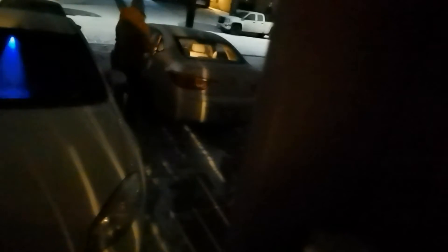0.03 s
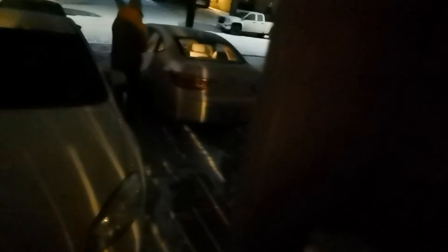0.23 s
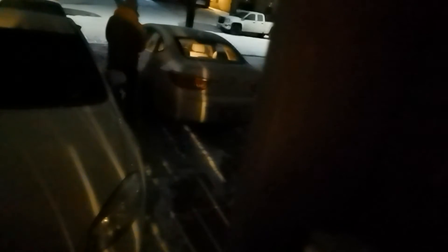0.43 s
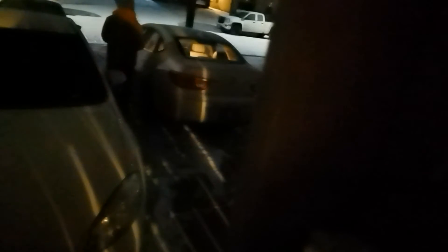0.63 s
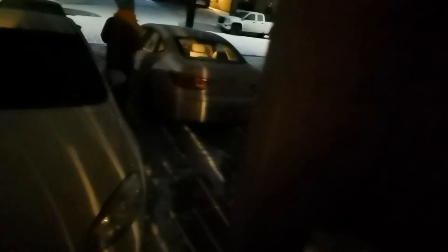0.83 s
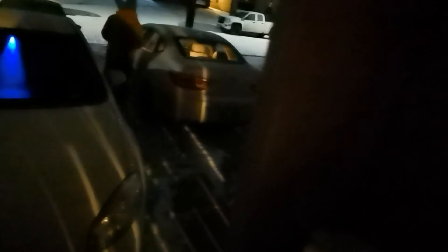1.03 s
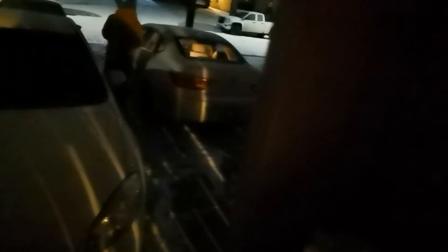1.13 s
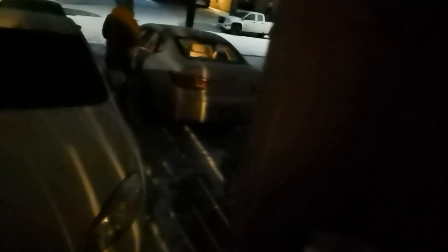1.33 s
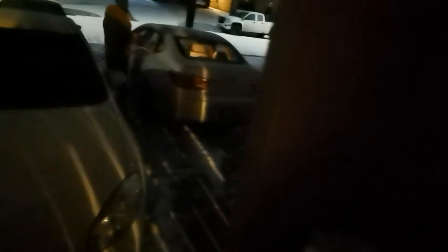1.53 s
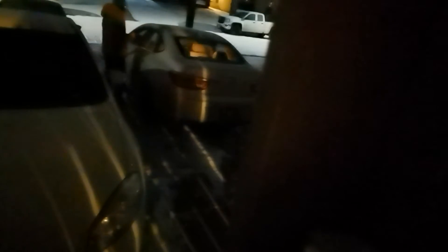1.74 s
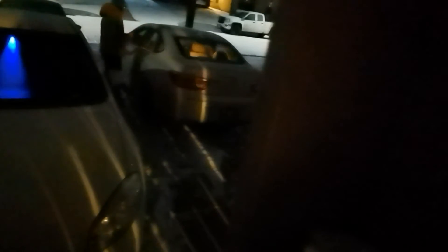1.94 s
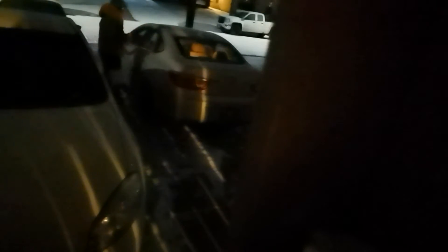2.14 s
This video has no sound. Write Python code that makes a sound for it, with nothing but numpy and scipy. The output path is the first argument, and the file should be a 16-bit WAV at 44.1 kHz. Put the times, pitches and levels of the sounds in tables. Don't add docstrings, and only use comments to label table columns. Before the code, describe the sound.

Outdoors in a night parking lot, a car door shuts with a sharp latch clack and deep thud, scattering off parked cars with a faint wall echo, then small footstep ticks over low far traffic.

```python
import sys
import numpy as np
from scipy import signal
from scipy.fft import rfft, irfft, next_fast_len
from scipy.io import wavfile
from scipy.ndimage import map_coordinates

SR = 44100
rng = np.random.default_rng(int(sys.argv[2]) if len(sys.argv) > 2 else 0)


def convert_level_to_amplitude(level_db):
    exponent = np.asarray(level_db, float) / 20
    return 10 ** exponent


def file_out(sig):
    cols = np.atleast_2d(sig).T
    lim = np.clip(cols, -1, 1)
    pcm = np.round(lim * 32767).astype(np.int16)
    wavfile.write(sys.argv[1], SR, pcm)


N = 97020
LUMPS_DB = 4.5


def unit(x):
    return x / np.sqrt(np.mean(x ** 2) + 1e-20)


def along(points, hz):
    f, v = np.transpose(points)
    return np.interp(np.log(hz + 1), np.log(f + 1), v)


def level(rows):
    return convert_level_to_amplitude(np.interp(np.arange(N) / SR, *np.transpose(rows)))


def wobble(rate):
    knots = rng.standard_normal(int(N * rate / SR) + 4)
    return map_coordinates(knots, [np.arange(N) * rate / SR])


def swell(length_s):
    u = np.linspace(0, 1, round(length_s * SR))
    uneven = convert_level_to_amplitude(1.3 * wobble(40)[SR:SR + len(u)])
    return np.minimum(u / .15, 1) * np.minimum((1 - u) / .3, 1) * uneven


def filtered(x, response):
    m = next_fast_len(x.shape[-1] + SR // 4)
    return irfft(rfft(x, m) * response(np.fft.rfftfreq(m, 1 / SR)), m)[..., :x.shape[-1]]


def peaks(table):
    def response(f):
        total = 0
        for k, (hz, width, db) in enumerate(table):
            total = total + (-1) ** k * convert_level_to_amplitude(db) * 1j * f * width / (hz * hz - f * f + 1j * f * width)
        return total
    return response


def band(hz, width):
    return lambda f: abs(peaks([(hz, width, 0)])(f)) ** 2


def lumpy(gain, depth_db):
    knots = rng.standard_normal(160)
    return lambda hz: gain(hz) * convert_level_to_amplitude(depth_db * map_coordinates(knots, [hz / 160]))


def pair(gain, alike, size):
    def mid_side(hz):
        turn = np.arccos(np.clip(along(alike, hz), -1, 1)) / 2
        return gain(hz) * [np.cos(turn), np.sin(turn)]
    mid, side = filtered(rng.standard_normal((2, size)), mid_side)
    return unit(np.array([mid + side, mid - side]))


def dying(x, t60, scale):
    hz, t, z = signal.stft(x, SR, nperseg=128)
    decay = convert_level_to_amplitude(-60 * t / (scale * along(t60, hz)[:, None]))
    return signal.istft(z * decay, SR, nperseg=128)[1][:, :x.shape[1]]


def ring(modes, t):
    return sum(convert_level_to_amplitude(db - 60 * t / t60) * np.sin(2 * np.pi * hz * t) for hz, db, t60 in modes)


def add(out, s, x):
    k = round(s * SR)
    out[:, k:k + x.shape[-1]] += x[..., :N - k]


# pitch_hz, likeness
CAR_ALIKE = [(60, .99), (350, .995), (650, .72), (1500, .75), (3100, .68), (6000, .05), (15000, -.1)]


def ping(hz, t60, crack, t):
    blur = pair(band(hz, .4 * hz), CAR_ALIKE, len(t))
    return convert_level_to_amplitude(-60 * t / t60) * (np.sin(2 * np.pi * hz * t) + crack * blur) * (1 - np.exp(-t / 0.00094))


# time_s, level_db
TRAFFIC = [(0, -47.5), (.55, -51), (.8, -50), (1.05, -48.5), (1.2, -51), (1.6, -51), (1.9, -50.5),
           (2.02, -49.5), (2.2, -51.5)]
# pitch_hz, level_db per Hz
ROAD = [(35, -32.5), (60, -2.5), (155, -4.5), (286, -7.5), (501, -16.5), (633, -18), (800, -30),
        (1160, -29.5), (2500, -47), (3250, -64), (5500, -120)]
# pitch_hz, likeness
ROAD_ALIKE = [(60, 0.9), (180, 1), (550, 0.86), (1650, -0.22), (4970, 1), (15000, -0.04)]
# time_s, level_db
RUMBLE = [(0, -41), (.12, -45), (.2, -52), (.48, -52), (.54, -46.5), (.6, -43.5), (.74, -51), (.9, -42.5),
          (1.22, -49), (1.27, -55), (1.35, -50), (1.6, -48.5), (2.0, -48), (2.2, -53.5)]
# pitch_hz, level_db per Hz
DEEP = [(8.8, -37.5), (15, -6), (54, -0.5), (83, -10), (114, -20), (130, -27.5), (170, -50.5), (290, -120)]
# pitch_hz, width_hz, level_db
DRONES = [(161.7, 29, -56),
          (1850, 15, -85), (1390, 60, -84)]


def street():
    sway = convert_level_to_amplitude(.7 * wobble(3.07) + .8 * wobble(12.11))
    road = level(TRAFFIC) * sway * pair(lambda hz: convert_level_to_amplitude(along(ROAD, hz)), ROAD_ALIKE, N)
    deep = level(RUMBLE) * pair(lambda hz: convert_level_to_amplitude(along(DEEP, hz)), [(50, 0.99)], N)
    drones = np.zeros((2, N))
    for hz, width, db in DRONES:
        drones += convert_level_to_amplitude(db + 2 * wobble(4.94)) * pair(band(hz, width), ROAD_ALIKE, N)
    return road + deep + drones


# start_s, peak_db, pitch_hz
TICKS = [(0.017, -62.5, 2650), (.018, -65.5, 4550), (0.3918, -43.5, 1270), (0.4083, -39, 1360),
         (.409, -54, 2390), (.425, -47.5, 1320), (.435, -59.5, 2680), (0.443, -55, 1300),
         (0.4773, -56.5, 1300), (0.642, -60.5, 1280), (.889, -58, 1330), (.889, -64, 950),
         (.891, -57.5, 2440), (0.948, -59, 990), (.969, -61, 2480), (.972, -61, 1480), (1.01, -59.5, 1342),
         (.83, -66, 3170), (.872, -67.5, 4930), (1.03, -70, 3950), (1.27, -69, 4150), (1.052, -58, 874),
         (1.059, -63, 2160), (1.059, -67.5, 3900), (1.118, -52, 790), (1.126, -57, 935), (1.156, -61, 1450),
         (1.244, -58, 1287), (1.244, -59.5, 2350), (1.287, -59.5, 1010), (1.429, -58, 760),
         (1.772, -58, 810), (1.853, -65, 760), (2.017, -50.5, 730), (2.05, -61, 750), (1.12, -67, 2700),
         (1.247, -60, 1510), (1.251, -49.5, 995), (1.61, -52.5, 1510), (1.612, -59, 960),
         (1.625, -58, 1675), (1.714, -59.5, 1210), (1.88, -66.5, 5320)]


def ticks():
    out, t = np.zeros((2, N)), np.arange(SR // 10) / SR
    for s, db, hz in TICKS:
        add(out, s, convert_level_to_amplitude(db - 4) * ping(hz, 0.068, 0.53, t))
    grit_db, spread_db, grit_hz, grit_t60 = -76, 3, 1400, .12
    for _ in range(90):
        place, size, force, pan = rng.random(), rng.standard_normal(), rng.exponential(), rng.standard_normal()
        tone = np.sin(2 * np.pi * grit_hz * np.exp(0.5 * size) * t)
        grain = convert_level_to_amplitude(-60 * t / grit_t60) * tone * (1 - np.exp(-t / 0.0076))
        sides_db = 3.0 * pan * np.array([[1], [-1]])
        add(out, place * (N - 1) / SR, convert_level_to_amplitude(grit_db + spread_db * force - 6 * size + sides_db) * grain)
    return out


# start_s, level_db, pitch_hz, t60_s
PINGS = [
    (0.1547, -50, 2670, 0.062),
    (.1835, -24.5, 3700, 0.021),
    (0.185, -36.5, 7300, 0.0138),
    (.185, -22.5, 462, 0.083),
    (0.21, -37, 780, .12),
    (0.2047, -32, 4050, 0.053),
    (0.2215, -25.5, 1240, 0.026),
    (.222, -40, 2450, 0.14),
    (.256, -30, 1500, 0.032),
    (0.2553, -36, 2500, 0.036),
]
# level_db, pitch_hz, width_hz
SEAL = (-64, 9500, 6000)


def latch():
    out, t = np.zeros((2, N)), np.arange(SR // 6) / SR
    for s, db, hz, t60 in PINGS:
        add(out, s, convert_level_to_amplitude(db) * ping(hz, t60, .8, t))
    db, hz, width = SEAL
    puff = swell(.022)
    add(out, .315, convert_level_to_amplitude(db) * puff * pair(lumpy(band(hz, width), LUMPS_DB), CAR_ALIKE, len(puff)))
    return out


# start_s, level_db, brightness_db per octave, panel_db, decay_scale
CONTACTS = [
    (0.155, -48, 1, -67.5, 0.84),
    (0.171, -51.5, 5, -69.5, 2.9),
    (0.183, -28.5, 2.5, -32, 1.14),
    (.197, -29, 2, -33, 0.51),
    (0.2027, -27, 2, -29, 1.08),
    (0.2212, -26.5, -2.5, -33.5, 1.07),
    (0.2552, -36.5, -3, -42.5, 1.37),
    (.297, -59, 11, -61, 1.7),
]
# pitch_hz, level_db, t60_s
PANEL = [(125, -12, 0.5), (167, -3, 0.29), (196.2, -9.5, 0.56), (231.4, -8, 0.69), (245, 1.5, 0.48),
         (287.3, 3.5, 0.25), (325, -9, 0.29), (383, -6.5, 0.21), (429, -16, .16), (466.8, -8.5, 0.42),
         (512.6, -5.5, 0.29), (597.4, -3.5, 0.19), (690, -8, 0.15), (780, -2.5, 0.14)]
# pitch_hz, width_hz, level_db
LATCH = [(1100, 72, -7.5), (1608, 150, 0), (2450, 160, -5.5), (3060, 140, -4.5), (3690, 94, -7.5),
         (4100, 60, -9)]
# pitch_hz, level_db per Hz
CLATTER = [(76, -13.5), (130, -10), (498, -8), (892, -30.5), (1110, -9), (2030, -29.5), (3930, -32),
           (5640, -42), (15700, -69.5)]
# pitch_hz, t60_s
DIES = [(150, 0.29), (500, 0.18), (1000, 0.088), (4000, 0.043), (12000, 0.22)]


def door():
    out, t = np.zeros((2, N)), np.arange(SR // 2) / SR
    rise = 1 - np.exp(-t / 0.0021)
    for s, db, tilt_db, panel_db, scale in CONTACTS:
        def tilt(hz):
            air_db = 18 * (hz > 12000) * (s < .19)
            return convert_level_to_amplitude(tilt_db * np.log2(np.clip(hz, 700, 8000) / 1500) - air_db)
        clatter_gain = lumpy(lambda hz: tilt(hz) * convert_level_to_amplitude(along(CLATTER, hz)), LUMPS_DB)
        broad = pair(clatter_gain, CAR_ALIKE, len(t))
        metal = pair(lambda hz: tilt(hz) * abs(peaks(LATCH)(hz)), CAR_ALIKE, len(t))
        clatter = dying(convert_level_to_amplitude(3.5) * broad + convert_level_to_amplitude(-4.5) * metal, DIES, scale)
        skin = ring([(hz, g + rng.normal(0, 3.27), t60) for hz, g, t60 in PANEL], t)
        skin = skin + [[.3], [-.3]] * filtered(np.roll(skin, 25), lambda hz: hz > 400)
        chatter = convert_level_to_amplitude(db + 1.5 * wobble(220)[SR:SR + len(t)])
        add(out, s, rise * (chatter * clatter + convert_level_to_amplitude(panel_db) * skin))
    return out


# start_s, level_db, centre_hz, t60_s
CLACKS = [(.184, -28.5, 3500, 0.011), (.1865, -44.5, 6000, 0.0069), (.1975, -30, 4000, 0.031),
          (.2045, -28.5, 3800, 0.023), (.2125, -39.5, 4200, 0.021), (0.2213, -25, 2500, 0.012),
          (.2265, -28, 2200, 0.012), (0.2342, -41, 2300, 0.013), (0.2432, -41.5, 2000, 0.029),
          (.2568, -31.5, 3200, 0.015), (0.277, -53.5, 2200, .03), (.296, -48.5, 2000, 0.056),
          (.305, -57, 2000, 0.035)]


def clacks():
    out, t = np.zeros((2, N)), np.arange(SR // 20) / SR
    for s, db, hz, t60 in CLACKS:
        gain = lambda f: abs(peaks([(hz, .8 * hz, 0)])(f)) / (1 + (f / 8180) ** 4)
        shape = convert_level_to_amplitude(db - 60 * t / t60) * (1 - np.exp(-t / .0003))
        add(out, s, shape * pair(gain, CAR_ALIKE, len(t)))
    return out


# pitch_hz, level_db, t60_s
CABIN_AND_BODY = [(30.3, -15.1, .49), (43.3, -2.1, .18), (56.3, -2.5, .26), (62.7, -4.4, .34),
                  (72.8, -4.4, .42), (79.2, -6.4, .32), (96.1, -22, .59), (93.5, -2, .1)]
# pitch_hz, level_db, t60_s
SPRINGS = (23.8, -5.5, .19)
# pitch_hz, level_db, t60_s
SETTLE = [(39, -18.3, .19), (48.7, -24, .31), (66.3, -16.3, .12), (98.8, -14.6, .13)]


def boom():
    t = np.clip(np.arange(N) / SR - .2013, 0, None)
    x = (1 - np.exp(-t / .0174)) * (ring(CABIN_AND_BODY, t) - ring([SPRINGS], t))
    late = np.clip(np.arange(N) / SR - .4154, 0, None)
    x = x + (1 - np.exp(-late / .059)) * ring(SETTLE, late)
    side = convert_level_to_amplitude(-24) * np.roll(x, round(.012 * SR))
    return np.array([x - side, x + side])


# pitch_hz, t60_s
LOT = [(200, 0.53), (1000, 0.44), (4000, 0.55), (12000, 0.35)]
# pitch_hz, width_hz, level_db
WALL = [(1310, 180, -11), (2490, 190, -5), (3480, 780, -10)]


def space(x):
    tail = dying(pair(np.ones_like, CAR_ALIKE, SR // 2), LOT, 0.87)
    lot = signal.fftconvolve(x, tail / np.linalg.norm(tail[0]), axes=1)[:, :N]
    answer = filtered(x, lambda f: peaks(WALL)(f) * f ** 2 / (f ** 2 + 900 ** 2))
    wall = np.roll(answer, round(.207 * SR), axis=1)
    return x + convert_level_to_amplitude(-14.5) * lot + convert_level_to_amplitude(-19) * wall


# start_s, length_s, level_db
HUMS = [
    (.45, 0.048, -71),
    (.7, 0.21, -76),
    (.885, 0.037, -74),
    (1.245, 0.044, -74.5),
    (1.705, 0.04, -76.5),
    (1.79, 0.052, -75.5),
    (2.01, .06, -79),
]


def whine():
    out, hz = np.zeros((2, N)), 1834
    for s, length, db in HUMS:
        e = swell(length)
        add(out, s, convert_level_to_amplitude(db) * e * pair(band(hz, 40), [(hz, .6)], len(e)))
    return out


# start_s, length_s, level_db, brightness_db per octave
RUSTLES = [
    (0.818, 0.13, -73, -6),
    (0.935, 0.17, -79, -12),
    (1.111, .04, -79, -11),
    (1.243, 0.058, -74.5, -3),
    (1.408, 0.084, -77.5, -2.5),
    (1.473, 0.26, -80, -6),
    (1.831, 0.16, -76.5, -2),
    (2.138, 0.045, -76.5, 2),
    (2.171, 0.051, -68.5, 2),
]
# pitch_hz, level_db per Hz
CLOTH = [(1180, -33), (2000, -12.5), (2520, -10), (2920, -9.5), (5070, -12.5), (5580, -12.5), (8810, -27),
         (12100, -6), (15700, -26)]
# pitch_hz, width_hz, level_db
SHELL = [(3980, 380, -10.5), (7100, 440, -5), (12300, 440, -7.5), (15200, 470, -9)]
# level_db, pitch_hz, width_hz, second_hz, second_db
SCRAPE = (-73.5, 4244, 450, 5198, -3.5)


def sleeve():
    out, alike = np.zeros((2, N)), [(2000, 1.0), (6000, 0.086)]
    for s, length, db, tilt_db in RUSTLES:
        e = swell(length)
        tilt = lambda hz: convert_level_to_amplitude(tilt_db * np.log2((hz + 1) / 6000)) * hz ** 2 / (hz ** 2 + 1500 ** 2)
        cloth = pair(lumpy(lambda hz: tilt(hz) * convert_level_to_amplitude(along(CLOTH, hz)), LUMPS_DB), alike, len(e))
        humps = peaks([(hz, width, g + rng.normal(0, 2.1)) for hz, width, g in SHELL])
        shell = pair(lambda hz: tilt(hz) * abs(humps(hz)), alike, len(e))
        add(out, s, convert_level_to_amplitude(db - 1) * e * (cloth + convert_level_to_amplitude(-3) * shell))
    db, hz, width, second_hz, second_db = SCRAPE
    length = .21
    e = swell(length) * convert_level_to_amplitude(np.linspace(2.5, -5, round(length * SR)))
    bands = lambda f: abs(peaks([(hz, width, 0), (second_hz, width, second_db)])(f)) ** 2
    add(out, 1.485, convert_level_to_amplitude(db) * e * pair(lumpy(bands, LUMPS_DB), alike, len(e)))
    return out


def scene():
    in_lot = space(ticks() + latch() + door() + clacks())
    return street() + in_lot + boom() + whine() + sleeve()


def roll_off(x):
    return signal.sosfilt(signal.butter(12, 16480, fs=SR, output="sos"), x)


# pitch_hz, level_db per Hz
HISS = [(900, -43.5), (2000, 0), (4000, -5), (8000, -7), (12500, -10), (14000, -9), (15800, -23)]


def record(dry):
    hiss = convert_level_to_amplitude(-78) * pair(lambda hz: convert_level_to_amplitude(along(HISS, hz)), [(1000, 0.21), (8000, 0.018)], N)
    mix = filtered(dry + hiss, lambda hz: hz < 15800)
    return roll_off(mix)


dry = scene()
out = record(dry)
file_out(out)
```